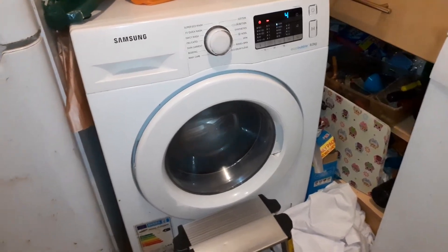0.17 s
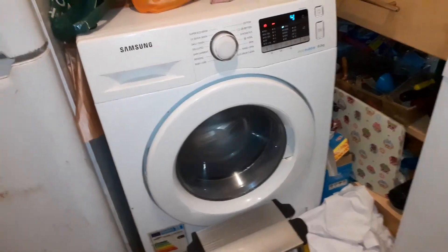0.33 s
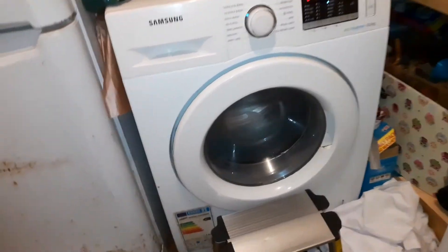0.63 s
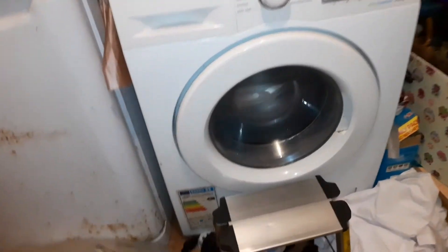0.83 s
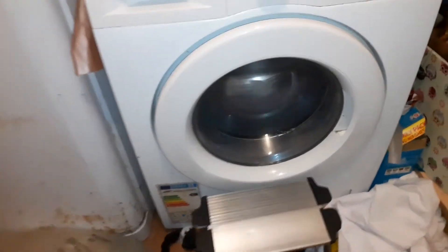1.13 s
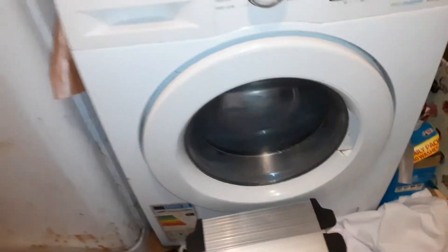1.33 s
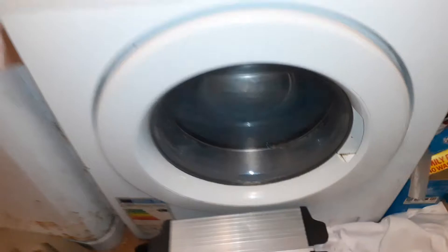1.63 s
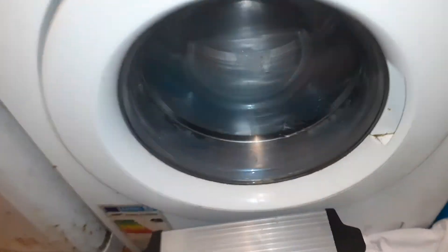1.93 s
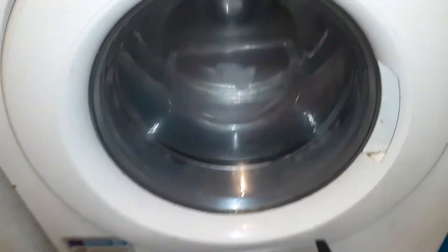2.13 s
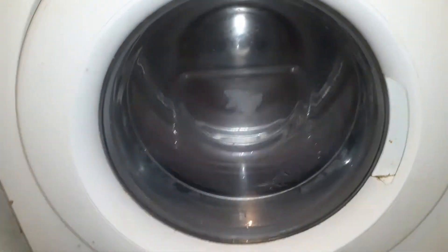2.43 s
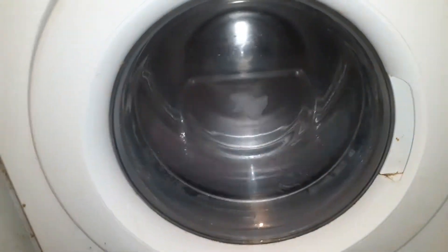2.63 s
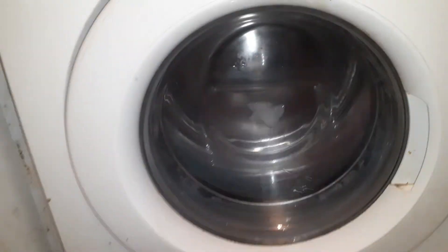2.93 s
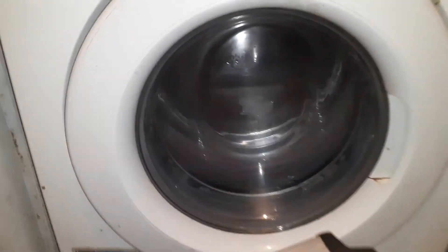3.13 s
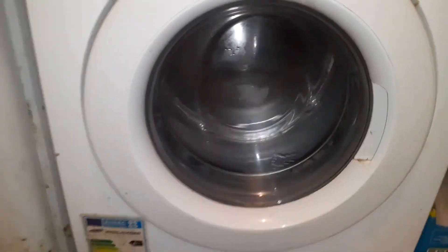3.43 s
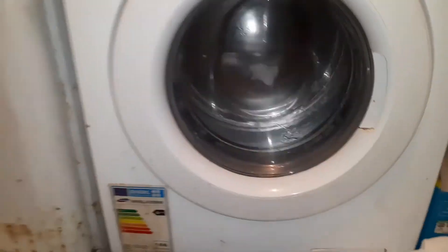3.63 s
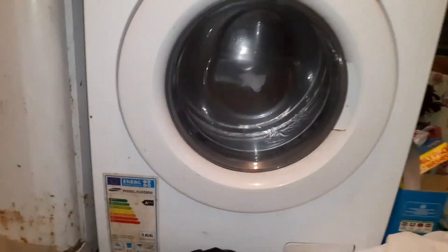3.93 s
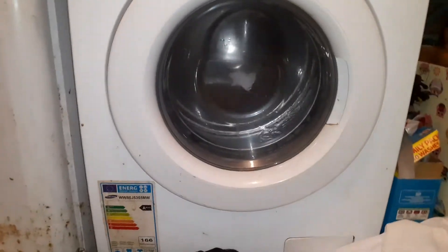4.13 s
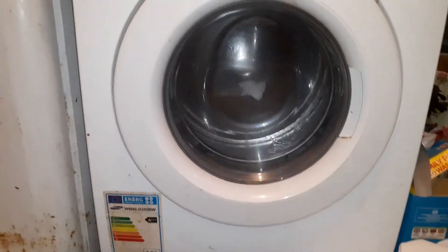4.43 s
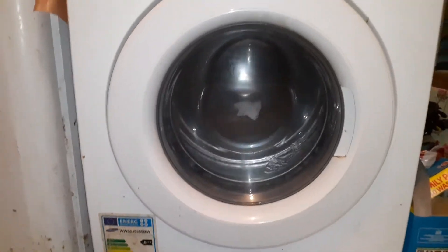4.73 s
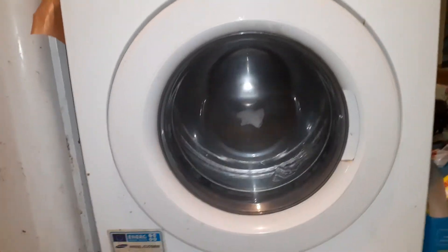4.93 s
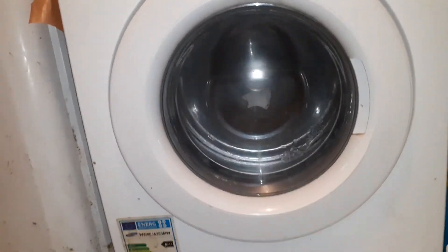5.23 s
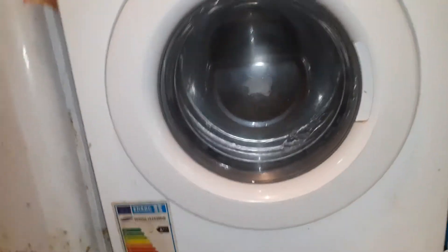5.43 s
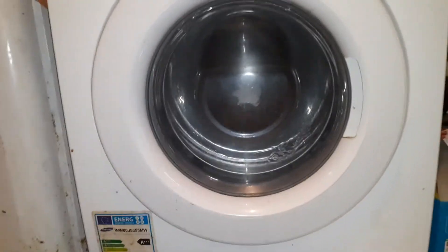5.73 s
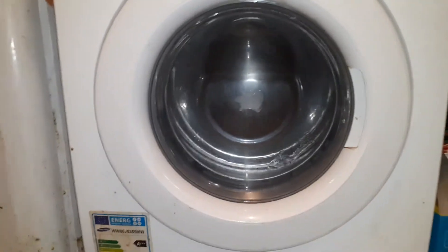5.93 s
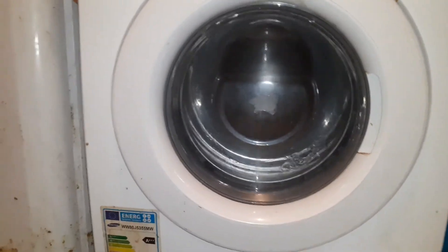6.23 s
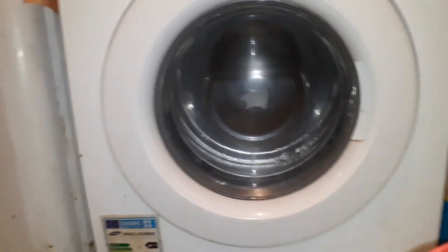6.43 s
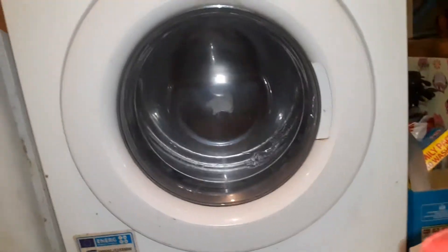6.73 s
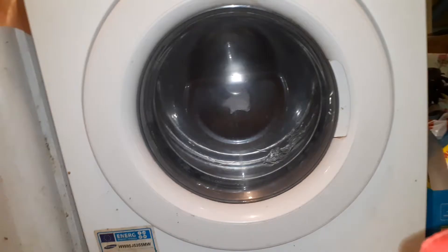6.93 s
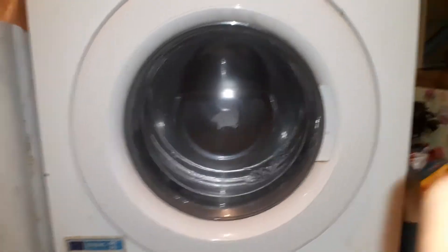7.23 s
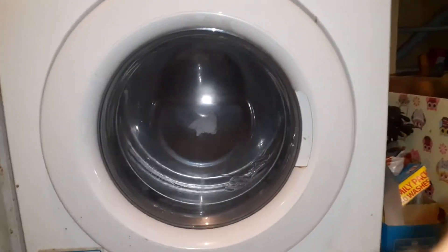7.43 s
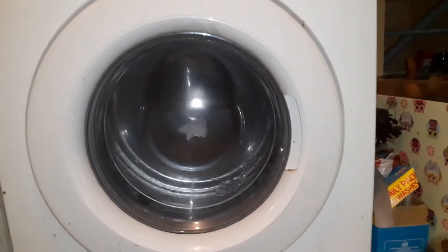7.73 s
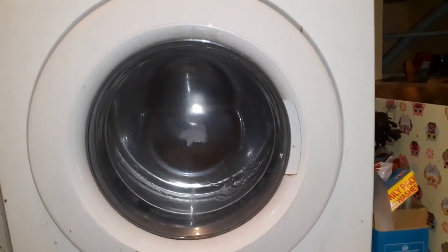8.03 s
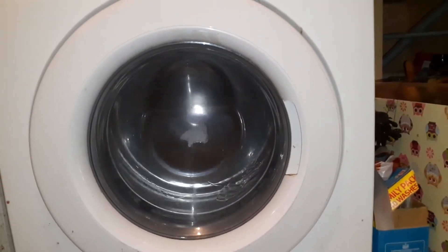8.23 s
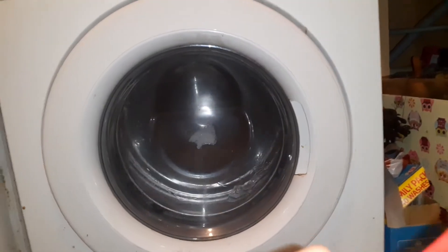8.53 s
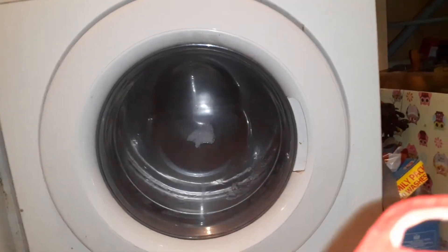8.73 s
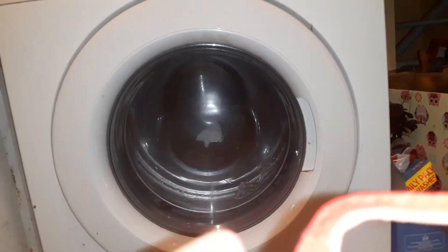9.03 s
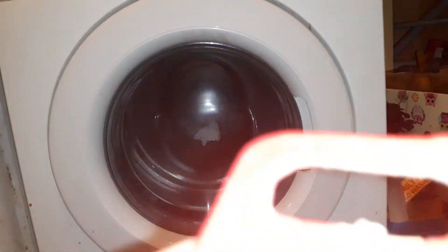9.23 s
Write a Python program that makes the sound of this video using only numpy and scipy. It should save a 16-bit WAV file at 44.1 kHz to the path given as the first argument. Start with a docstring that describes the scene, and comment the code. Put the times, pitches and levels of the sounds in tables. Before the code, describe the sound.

A washer's fast spin fills a small hard-walled room, already running and never stopping. The hum and piercing whine swell and fade as the close, hand-held microphone approaches the drum door, where the rumble grows. A pump drones underneath. Around four seconds come two sharp plastic clatters, then a slight rise in motor pitch that settles back. Light ticks and rustling appear later, with another small surge near the end.

```python
"""A cramped utility room: a front-loading washing machine at full spin, a hand-held microphone moving to the door.
The brush motor, a sum of multiples of its speed replayed at the shaft's angle, hums, buzzes and surges twice.
The belted drum adds tones, the drain pump drones on mains multiples; shaped noise is the tub, air and brush hiss.
Close by, two sharp, hollow plastic clacks (noise cracks and ringing modes), faint ticks and soft rustles (noise)."""
import sys
import numpy as np
from scipy import signal
from scipy.fft import rfft, irfft
from scipy.io import wavfile
from scipy.ndimage import map_coordinates

SR = 44100
rng = np.random.default_rng(int(sys.argv[2]) if len(sys.argv) > 2 else 0)


def dump_mix(stems):
    """Bounce the given channels to the path in sys.argv[1] as a 16-bit WAV at rate SR."""
    frames = np.atleast_2d(stems).T  # one column per channel
    limited = np.clip(frames, -1, 1)  # hard clip at full scale
    pcm = np.round(limited * 32767).astype(np.int16)
    wavfile.write(sys.argv[1], SR, pcm)


N = 413216
HOP = 441  # samples per frame of the slow curves
TIME = np.arange(N) / SR
FRAME_TIME = np.arange(N // HOP + 2) * HOP / SR
BELT_RATIO = 11.635  # motor turns per drum turn


def from_db(db):
    """Decibels to gain."""
    return 10 ** (np.asarray(db) / 20)


def rms_one(x):
    """Scale to unit power."""
    return x / np.sqrt(np.mean(np.abs(x) ** 2) + 1e-20)


def in_time(rows, time=TIME):
    """The columns of a curve table, read at the given times."""
    time_s, *columns = np.transpose(rows)
    return [np.interp(time, time_s, column) for column in columns]


def at_hz(points, hz):
    """Read a spectrum on a log-frequency axis."""
    point_hz, value = np.transpose(points)
    return np.interp(np.log(np.maximum(hz, 1)), np.log(point_hz), value)


def slow_chance(rate_hz, shape=()):
    """Smooth random motion, one value a frame, unit power: white noise through a double pole."""
    pole = np.exp(-2 * np.pi * rate_hz * HOP / SR)
    count = len(FRAME_TIME)
    white = rng.standard_normal(shape + (2 * count,))
    smooth = signal.lfilter([1], [1, -2 * pole, pole * pole], white)
    return rms_one(smooth[..., count:])  # the first half lets the filter settle


def drift(rate_hz):
    """Smooth random motion, one value a sample."""
    return np.interp(TIME, FRAME_TIME, slow_chance(rate_hz))


def wander(rate_hz, shape):
    """Random size and phase, one value a frame, unit power."""
    return rms_one(slow_chance(rate_hz, shape) + 1j * slow_chance(rate_hz, shape))


# How alike the noise reaches the two sides of the microphone: pitch_hz, likeness (0-1)
LIKENESS = [(30, 0.72), (120, 0.91), (300, 0.76), (600, 0.95), (1200, 0), (2500, 0.028), (16000, 0.0049)]


def noise(spectrum):
    """Stereo noise of a given density in dB per Hz; a shared and an opposed part set the likeness."""
    hz = np.arange(N // 2 + 1) * SR / N
    alike = np.clip(at_hz(LIKENESS, hz), -1, 1)
    mid, side = rfft(rng.standard_normal((2, N)))
    pair = np.sqrt((1 + alike) / 2) * mid + np.sqrt((1 - alike) / 2) * side * [[1], [-1]]
    return irfft(pair * from_db(at_hz(spectrum, hz)), N) * np.sqrt(SR / 2)


def tone(turns, level_db, waver_db, waver_rad):
    """A line that wavers in level and phase; level is rms."""
    level = np.sqrt(2) * from_db(level_db + waver_db * drift(2.5))
    return level * np.sin(2 * np.pi * turns + waver_rad * drift(1.16))


def resonate(x, hz, width_hz):
    """One two-pole resonance, gain about 1 on top."""
    r = np.exp(-np.pi * width_hz / SR)
    feedback = [1, -2 * r * np.cos(2 * np.pi * hz / SR), r * r]
    return signal.lfilter(np.array([1, 0, -1]) * (1 - r * r) / 2, feedback, x)


def burst(start_s, level_db, t60_s):
    """Envelope of a contact: instant rise, exponential decay to 120 dB below its start."""
    age = TIME - start_s
    return (age >= 0) * from_db(level_db - 60 * np.clip(age / t60_s, 0, 2))


def clatter(depth_db, grain_s):
    """An uneven level, drawn anew every grain and joined by lines; unit power."""
    times = np.arange(0, N / SR, grain_s)
    return rms_one(from_db(depth_db * np.interp(TIME, times, rng.uniform(-0.18, 0.6, len(times)))))


SURGE_RISE_S, SURGE_HOLD_S, SURGE_RELEASE_S = 0.11, 0.85, 0.45


def surge_shape(start_s):
    """A quick rise, a hold, a release (0-1)."""
    corners = np.cumsum([0, SURGE_RISE_S, SURGE_HOLD_S, SURGE_RELEASE_S])
    return np.interp(TIME - start_s, corners, [0, 1, 1, 0])


# Cruising speed of the motor: time_s, speed_turns_per_s
CRUISE = [(0, 224.15), (1.1, 224.95), (2.2, 223.98), (3.3, 224.17), (4.2, 224.5), (5.9, 224.7),
          (6.8, 224.0), (7.4, 224.25), (9.37, 224.35)]
# The controller kicks the motor on, holds it a while and lets go:
# start_s, gain_turns_per_s (before the sag)
SURGES = [(4.62, 2.6), (8.84, 2.7)]
SAG_TURNS_PER_S2 = 1.3


def motor_speed():
    """Turns per second: the cruising speed, and surges that sag while they are held."""
    speed = in_time(CRUISE)[0]
    for start_s, gain in SURGES:
        sag = SAG_TURNS_PER_S2 * (TIME - start_s - SURGE_RISE_S)
        speed = speed + surge_shape(start_s) * (gain - sag)
    return speed


# Brush buzz, base level along the motor orders: pitch_hz, level_db
BUZZ = [(670, -66), (1120, -58), (1800, -68.5), (2690, -63), (3590, -61), (4490, -61.5), (5390, -69),
        (6060, -72), (7410, -65), (8300, -63), (10320, -65.5), (11670, -61), (13460, -64), (15710, -67.8)]
# Orders that stand out of the buzz or sink into it: order, extra_db
UNEVEN_ORDERS = [(3, -8), (6, 5), (8, 5), (9, -7), (10, 2), (11, -2), (12, -4), (14, -1.5), (15, -1.5),
                 (16, -0.5), (19, -0.5), (20, -4), (21, -3), (22, -2), (23, 4), (24, 5.5), (25, 5),
                 (26, 4.5), (27, 1.5), (28, 4), (29, 7), (30, -2), (31, 7), (36, 5), (37, -3), (42, -3),
                 (46, -8), (50, -3), (51, 4), (56, -3), (57, -4), (58, -6), (60, -6), (64, 4), (68, -5)]
# Swell of the buzz's treble: time_s, treble_db, top_octave_db
TREBLE_SWELL = [(0, 1, -1.5), (2.7, 2.5, 0), (4.4, 1.5, -0.5), (4.75, 3.5, 2), (5.45, 0.5, 0.5),
                (6.1, 1.5, 0), (6.95, 2.5, 2), (7.3, 2.5, 4), (9.37, 3.5, 1.7)]
# Quick tremble of the orders: pitch_hz, share
TREMBLE = [(900, 0.25), (6000, 0.4), (9000, 0.85)]
# A lesser whine sings out where the microphone crosses a crest of its standing wave:
# middle_s, swell_and_fade_s, motor_order, left_db, right_db
CRESTS = [(0.3, 0.1, 29, -53, -62), (0.95, 0.07, 16, -55, -65), (0.95, 0.1, 10, -56.5, -56),
          (1.0, 0.35, 14, -58, -68), (1.1, 0.09, 23, -57.5, -55.5), (1.65, 0.1, 10, -54, -63),
          (1.8, 0.08, 16, -50.5, -63), (2.2, 0.12, 16, -54, -57), (2.5, 0.15, 23, -57, -66),
          (2.95, 0.12, 14, -65, -54), (3.08, 0.33, 15, -54.5, -68), (5.34, 0.08, 16, -52.5, -54),
          (5.62, 0.12, 16, -54.5, -65), (5.9, 0.5, 29, -55, -68), (6.0, 0.45, 23, -56.5, -62),
          (6.15, 0.15, 15, -56, -68), (6.7, 0.1, 16, -55, -63), (7.0, 1.0, 10, -75, -57),
          (7.6, 0.4, 29, -58, -54.5), (8.3, 0.32, 29, -52.5, -63), (8.4, 0.35, 23, -68, -57.5),
          (9.15, 0.22, 29, -60, -52)]
# One motor order grows near the door: its number, base level, and dB gained per dB of rumble
DOOR_ORDER, DOOR_DB, DOOR_FOLLOWS = 4, -59, 2.6


def brush_buzz(flicker_db, near_db, steady=0.46, fade_hz=1.64, scatter_hz=12, buzz_db=-0.26, count=70):
    """Brush contact sounds every multiple of the shaft speed: gains as channels x orders x frames."""
    hz = np.arange(1, count + 1) * np.median(np.array(CRUISE)[:, 1])
    level_db = at_hz(BUZZ, hz) + buzz_db
    for order, extra_db in UNEVEN_ORDERS:
        level_db[order - 1] += extra_db
    treble_db, top_db = in_time(TREBLE_SWELL, FRAME_TIME)
    treble = np.interp(hz, [2000, 5000], [0, 1])[:, None]
    top = np.interp(hz, [9000, 11000], [0, 1])[:, None]
    swell_db = (1 - top) * treble_db + top * top_db
    level = from_db(level_db[:, None] + treble * (swell_db + flicker_db))
    # each order has its own standing waves, so it fades in and out as the microphone moves
    direct = np.exp(2j * np.pi * rng.random((2, count, 1)))
    field = steady * direct + (1 - steady) * wander(fade_hz, (2, count))
    field /= np.sqrt(np.mean(np.abs(field) ** 2, axis=2, keepdims=True))
    # in this order the standing-wave part keeps its size and only grows with nearness to the door
    door = DOOR_ORDER - 1
    level[door] = from_db(DOOR_DB + DOOR_FOLLOWS * near_db)
    field[:, door] = np.exp(.4j * slow_chance(fade_hz, (2,)))
    # the brushes never touch twice alike: every order also trembles quickly
    tremble = at_hz(TREMBLE, hz)[:, None] * wander(scatter_hz, (2, count))
    gains = level * (field + tremble)
    for middle_s, length_s, order, left_db, right_db in CRESTS:
        shape = np.exp(-((FRAME_TIME - middle_s) / length_s) ** 2 / 2)
        swell = from_db([[left_db], [right_db]]) * shape
        gains[:, order - 1] += swell * (1j * direct[:, order - 1] + .5 * tremble[:, order - 1])
    return gains


# Whine of the rotor slots, swelling and sinking as the microphone moves through its standing waves:
# time_s, left_db, right_db (base levels)
SLOT_WHINE = [(0.0, -63.0, -60.5), (0.3, -42.5, -57), (0.42, -46.0, -45.0), (0.5, -57.0, -58.0),
              (0.62, -46, -43), (0.72, -59, -44.5), (0.78, -53.0, -52.5), (1.18, -58, -56),
              (1.3, -40.5, -55), (1.38, -55, -57), (1.48, -53.5, -54.0), (1.56, -64, -48), (1.6, -58, -56),
              (1.74, -58, -54.0), (1.92, -42, -44), (2.0, -62, -52), (2.16, -53, -59), (2.24, -47, -44),
              (2.44, -49, -42), (2.66, -54.0, -41.5), (2.78, -46, -53), (2.98, -50, -55.0),
              (3.04, -54, -49.5), (3.18, -53, -58.0), (3.24, -48, -53.0), (3.46, -60, -50),
              (3.58, -44, -53.5), (3.66, -59, -50), (3.76, -51.0, -59), (3.82, -59, -55),
              (4.04, -45.5, -48.5), (4.5, -47.5, -54.0), (4.7, -56, -54), (4.82, -53.5, -63),
              (4.92, -47, -50.0), (5.18, -49, -48), (5.32, -41, -44), (5.42, -63, -67), (5.54, -50, -53),
              (5.66, -62, -62.0), (5.9, -44.0, -44.5), (6.7, -42.5, -44.5), (6.8, -45.5, -45.5),
              (7.1, -47.5, -42.0), (7.22, -54, -45), (7.48, -46, -47), (7.56, -57, -50), (8.06, -50, -48),
              (8.16, -52.5, -46.5), (8.42, -65, -49.5), (8.74, -57, -52), (8.84, -63, -51),
              (8.96, -49, -46), (9.36, -55, -45.5)]
# The whine's phase between the two sides turns along the same path: time_s, left_lead_rad
WHINE_LEAD = [(0, 6.3), (0.4, 3.5), (0.9, 1.3), (1.35, 1.8), (1.85, -0.3), (2.25, 0), (2.5, -1.5),
              (2.75, -1.5), (3.0, -3.7), (3.45, 0.2), (4.45, 1.7), (5.05, -2.3), (5.8, -0.8), (6.5, -1.2),
              (8.2, -0.3), (8.5, 1.7), (9.05, 1.2), (9.37, 3.5)]


def slot_whine(phase_rad=0.4, flutter_db=2.05):
    """Size and phase of the whine on each side: a clean line that flutters a little."""
    lead = in_time(WHINE_LEAD, FRAME_TIME)[0] * np.array([[.5], [-.5]])
    phase = lead + phase_rad * slow_chance(1.0)
    level_db = in_time(SLOT_WHINE, FRAME_TIME) + flutter_db * slow_chance(9.4, (2,))
    return from_db(level_db) * np.exp(1j * phase)


# Hum of the rotor's unbalance, with a quiet spot on the way to the door: time_s, level_db (mean of the sides)
UNBALANCE = [(0, -40.5), (0.6, -43.5), (1.2, -50), (1.9, -35.5), (2.9, -36.5), (4.3, -39.5), (5.4, -37.5),
             (9.37, -37.5)]
# Hum of the magnetic poles among the room's standing waves: time_s, left_db, right_db, left_lead_rad
POLE_HUM = [(0, -26.5, -27, -0.75), (0.6, -25, -29, -1.2), (1.2, -36.5, -23, -1.55),
            (1.6, -25, -22.3, 0.32), (1.92, -21.6, -27.5, 0.14), (2.5, -24.5, -27, -0.44),
            (3.2, -26.5, -29.5, 0.1), (3.6, -29, -31, 0.4), (4.0, -31, -25.5, 0.52),
            (4.45, -33.5, -27, 0.83), (4.9, -28.5, -27, 0.6), (5.45, -33, -39.5, 0.3),
            (6.25, -36, -39.5, 0.71), (7.2, -33.5, -35, 0.71), (7.8, -36, -35, 0.88), (9.37, -30, -32, 0.4)]


def motor(turns, flicker_db, near_db, whine_db=-0.2, size=2048):
    """One turn of the motor as a sum of orders, replayed at the shaft's angle."""
    gains = brush_buzz(flicker_db, near_db)
    sides = np.array([[1], [-1]])
    # unbalance is order 1, the two magnetic poles order 2, the rotor slots order 18
    left_db, right_db, lead = in_time(POLE_HUM, FRAME_TIME)
    unbalance_db = in_time(UNBALANCE, FRAME_TIME)[0] + 0.84 * sides
    gains[:, 0] = from_db(unbalance_db) * np.exp(.15j * sides)
    gains[:, 1] = from_db([left_db, right_db]) * np.exp(.5j * lead * sides)
    gains[:, 17] = from_db(whine_db + flicker_db) * slot_whine()
    # the waveform of one turn at every frame, read at the shaft's angle and the present frame
    spectrum = np.pad(gains, ((0, 0), (1, 0), (0, 0)))
    cycles = irfft(spectrum, size, axis=1) * size / np.sqrt(2)
    where = [turns % 1 * size, np.arange(N) / HOP]
    return np.array([map_coordinates(cycle, where, order=1, mode="grid-wrap") for cycle in cycles])


def ripple(hum, drum_turns, depth=0.2, band_hz=(2500, 8000), turn_rad=1.3, per_drum_turn=6):
    """The motor's treble wobbles six times a drum turn, mostly in phase: faint side tones by its orders."""
    band = signal.butter(2, band_hz, "band", fs=SR, output="sos")
    treble = signal.sosfilt(band, hum)
    turned = irfft(rfft(treble) * np.exp(1j * turn_rad), N)
    return depth * np.sin(2 * np.pi * per_drum_turn * drum_turns) * turned


def belt_pull(lag_s=0.06):
    """How hard the belt pulls (0-1): it takes up each surge a moment late."""
    return sum(surge_shape(start_s + lag_s) for start_s, _ in SURGES)


# Drum tones: drum_order (multiple of the drum speed), level_db (before nearness)
DRUM_TONES = [(9, -56.5), (13, -61), (14, -54), (15, -56.5), (18, -61), (19, -65), (20, -67.5), (36, -57),
              (44, -64.5), (48, -71), (63, -80), (101, -66.5)]
# Motor tones under the drum's load: motor_order, drum_order_added, level_db, surge_extra_db
SIDEBANDS = [(2, -1, -49, 0), (2, 1, -57.5, -6), (2, 2, -56, 13.5), (3, 0, -59.5, 7.5), (5, -1, -65, -4),
             (5, 0, -63, 5), (6, -1, -70.5, 6), (6, 0, -67.5, 14)]


def drum(motor_turns, surge, near_db, nearness=1.52):
    """The drum's own tones, and the sidebands it puts on the motor, which rise or sink in a surge."""
    turns = motor_turns / BELT_RATIO
    own = sum(tone(order * turns, db + nearness * near_db, waver_db=2.5, waver_rad=0.9)
              for order, db in DRUM_TONES)
    shaken = sum(tone(motor_order * motor_turns + drum_order * turns, db + pull_db * surge,
                      waver_db=1.5, waver_rad=0.3)
                 for motor_order, drum_order, db, pull_db in SIDEBANDS)
    return own + shaken


# Drain pump: mains_multiple, level_db, share of the standing wave's swing that it follows
PUMP_LINES = [(2, -61.5, -0.11), (3, -58, 0.52), (4, -44.5, 1), (6, -53.5, 0.23), (12, -56.5, -0.74),
              (22, -61, 0.075)]
# The pump's drone in its own standing wave along the microphone's way: time_s, swing_db
DRONE_SWING = [(0, -1), (1.4, -4.5), (1.9, 5), (3.0, 2.5), (4.3, -4), (6.0, 0), (9.37, -4.5)]
MAINS_HZ = 50.13


def pump():
    """The pump runs in step with the mains; its lines rise or sink through their standing waves."""
    swing_db, = in_time(DRONE_SWING)
    return sum(tone(multiple * MAINS_HZ * TIME, db + share * swing_db, waver_db=0.6, waver_rad=0.44)
               for multiple, db, share in PUMP_LINES)


# Spectra of the tub's rumble, the air rushing round the drum, a resonant cabinet panel and the
# fine hiss of the brushes, before their level curves: pitch_hz, density_db_per_hz
RUMBLE = [(25, -104), (40, -92), (60, -81.5), (90, -73.5), (125, -74), (180, -70.5), (280, -68), (400, -71),
          (550, -81.5), (900, -100)]
AIR_RUSH = [(200, -100), (400, -73), (560, -75), (650, -71.5), (730, -74), (860, -68.8), (980, -74),
            (1140, -73.7), (1300, -79.7), (1800, -85.3), (3300, -87.8), (4900, -104), (8000, -125)]
PANEL = [(380, -97), (470, -60), (505, -73), (540, -73.5), (680, -95)]
BRUSH_HISS = [(2500, -110), (3800, -90.5), (4900, -97.5), (6200, -102), (7400, -97.5), (8300, -92),
              (10000, -94.5), (12000, -89), (16000, -94)]
# Panel level as the microphone moves, and hiss level: time_s, level_db (added to the spectrum)
PANEL_LEVEL = [(0, -2.5), (1.4, 3.5), (2.4, -0.5), (3.5, -0.5), (4.3, -6), (9.37, -12)]
HISS_LEVEL = [(0, -0.8), (3.4, -0.2), (5.3, -0.8), (6.6, 1.6), (9.37, 1.4)]


def tub(rumble_db, rush_db):
    """The tub rumbles unevenly and stirs a panel, air rushes round the drum, the brushes hiss beneath."""
    rumble = from_db(rumble_db + 1.0 * drift(1.3)) * noise(RUMBLE)
    rush = from_db(rush_db) * noise(AIR_RUSH)
    panel = from_db(in_time(PANEL_LEVEL)[0]) * noise(PANEL)
    hiss = from_db(in_time(HISS_LEVEL)[0]) * noise(BRUSH_HISS)
    return rumble + rush + panel + hiss


# Modes of the hollow plastic body: pitch_hz, relative_db, t60_s
HOLLOW_MODES = [(630, -9, 0.14), (696, 4, 0.085), (895, -7, 0.16), (960, 2, 0.068), (1027, -10, 0.16),
                (1290, 1.5, 0.094), (1444, -2.5, 0.074)]


def hollow_ring(start_s, favoured_hz, reach_octaves=0.3, side_rad=0.76):
    """A contact sets every mode of the body ringing, favouring those near its own pitch."""
    out, start = np.zeros((2, N)), int(start_s * SR)
    age = np.arange(SR // 2) / SR
    for hz, db, t60_s in HOLLOW_MODES:
        phase = 2 * np.pi * rng.random() + side_rad * rng.standard_normal((2, 1))
        strength = from_db(db) / (1 + (np.log2(hz / favoured_hz) / reach_octaves) ** 2)
        decay = np.exp(-np.log(1000) * age / t60_s)
        out[:, start:start + len(age)] += strength * decay * np.sin(2 * np.pi * hz * age + phase)
    return out


# Plastic contacts close to the microphone, base levels:
# start_s, crack_db, knock_db, t60_s, knock_favours_hz, plastic_ring_db, crack_favours_hz
CONTACTS = [(3.895, -18, -23.5, 0.084, 990, -11, 5700), (3.9026, -20, -19, 0.056, 1150, -6, 8500),
            (3.9064, -20.5, -23, 0.06, 1000, -10, 8800), (3.9158, -21, -25, 0.044, 964, -7, 6500),
            (3.919, -21.5, -29, 0.064, 1200, -9, 8500), (3.928, -26, -22, 0.098, 1290, -6, 3500),
            (3.941, -29, -38, 0.09, 1000, -11, 8000), (4.549, -41, -29, 0.06, 990, -3, 8000),
            (4.5545, -27.5, -25, 0.092, 1410, -2, 8500), (4.5658, -22.5, -16, 0.057, 880, 4, 9500),
            (4.5706, -14.5, -24, 0.072, 690, 2, 8150), (4.579, -22, -31, 0.18, 1100, -6, 7500)]
# Colours of the crack and of the knock: pitch_hz, relative_db_per_hz
CRACK_COLOUR = [(500, -18), (1500, -3), (2600, -1.5), (4200, -2), (6000, -2), (8000, -1), (11000, -2.5),
                (16000, -6)]
KNOCK_COLOUR = [(30, -42), (80, -28), (200, -2), (450, -2), (700, -4), (1200, -4), (1800, -10), (3500, -21),
                (8000, -45)]
# Hard ring of the struck plastic: pitch_hz, width_hz, relative_db
PLASTIC_RING = [(1970, 90, -17), (4100, 64, 12.5), (4500, 100, -6), (5100, 120, -4)]


def clacks(room_db=-17, room_t60_s=0.41, hollow_db=-4, thud_db=-2,
           snap_db=-1, snap_t60_s=0.0054, bright_db=-1, bright_width_hz=900):
    """Each contact is a ringing crack and a thud, with a short tail off near walls, and rings the body."""
    snap, push = noise(CRACK_COLOUR), rms_one(noise(KNOCK_COLOUR))
    ringing = sum(from_db(db) * resonate(snap, hz, width) for hz, width, db in PLASTIC_RING)
    cracks, knocks = 0, 0
    for start_s, crack_db, knock_db, t60_s, knock_hz, ring_db, bright_hz in CONTACTS:
        decay = np.hypot(burst(start_s, 0, t60_s), burst(start_s, room_db, room_t60_s))
        shift = rng.integers(N)  # a fresh stretch of the noise for each contact
        bright = from_db(bright_db) * resonate(snap, bright_hz, bright_width_hz)
        crack = np.roll(rms_one(snap + from_db(ring_db) * ringing + bright), shift, axis=1)
        crack_shape = np.hypot(decay, burst(start_s, snap_db, snap_t60_s))
        cracks = cracks + from_db(crack_db) * crack_shape * crack
        thud = from_db(thud_db) * decay * np.roll(push, shift, axis=1)
        hollow = from_db(hollow_db) * hollow_ring(start_s, knock_hz)
        knocks = knocks + from_db(knock_db) * (thud + hollow)
    return cracks * clatter(depth_db=1.5, grain_s=0.0015) + knocks


# Faint ticks: start_s, level_db
TICKS = [(6.005, -31), (6.264, -35), (6.585, -37), (6.630, -36), (6.747, -33), (6.815, -38), (7.246, -32),
         (7.272, -35), (7.705, -38), (7.960, -37), (8.360, -33)]
# Soft rustles: middle_s, level_db, swell_and_fade_s
RUSTLES = [(6.6, -43, 0.08), (7.155, -38.5, 0.07), (7.255, -44, 0.035)]
# Colour of the ticks and the rustles: pitch_hz, relative_db_per_hz
RUSTLE_COLOUR = [(300, -8), (1000, 5), (2500, 5), (5000, 1), (9000, 0), (16000, 4)]


def small_sounds(tick_t60_s=0.031):
    """Light ticks are decaying noise; brief rustles are swelling noise with a grainy level."""
    rustle = sum(from_db(db) * np.exp(-((TIME - middle_s) / length_s) ** 2 / 2)
                 for middle_s, db, length_s in RUSTLES)
    grains = clatter(depth_db=3.5, grain_s=0.002)
    ticks = sum(burst(start_s, db, tick_t60_s) for start_s, db in TICKS)
    return (ticks + rustle * grains) * rms_one(noise(RUSTLE_COLOUR))


# Change of level as the microphone nears the door: time_s, rumble_db, rush_db
NEARNESS = [(0, -1, -1.5), (1.2, -0.8, 0), (2.3, 3.5, -0.5), (3.4, 2.5, 0.5), (4.6, 3, 0.5), (6.3, 3.5, 2),
            (9.37, 4, 1)]
RIGHT_LAG_S = 0.00017


def scene(flutter=0.11, brush_db=1.18, sway_db=-0.25, rush_share=0.11, throb_depth=0.063):
    """The motor's angle drives motor and drum; pump, noises and contacts join them at the microphone."""
    turns = np.cumsum(motor_speed() + flutter * drift(21.0)) / SR
    drum_turns = turns / BELT_RATIO
    drum_sway = np.sin(2 * np.pi * drum_turns)
    # brush pressure varies by chance and with every sway of the drum
    flicker_db = brush_db * drift(24) + sway_db * drum_sway
    rumble_db, rush_db = in_time(NEARNESS)
    tones = drum(turns, belt_pull(), rumble_db) + pump()
    left, right = tones + tub(rumble_db, rush_db + rush_share * flicker_db)
    lagged_right = np.interp(TIME - RIGHT_LAG_S, TIME, right)
    body = np.array([left, lagged_right]) * from_db([[.4], [-.4]])
    # the uneven load makes the motor throb once a drum turn
    throb = 1 + throb_depth * drum_sway
    frame_flicker_db = np.interp(FRAME_TIME, TIME, flicker_db)
    hum = motor(turns, frame_flicker_db, np.interp(FRAME_TIME, TIME, rumble_db))
    return throb * hum + ripple(hum, drum_turns) + body + clacks() + small_sounds()


def record(dry, cutoff_hz=15850):
    """The microphone's top is cut steeply."""
    return signal.sosfilt(signal.ellip(12, .1, 80, cutoff_hz, fs=SR, output="sos"), dry)


dry = scene()
out = record(dry)
dump_mix(out)
```